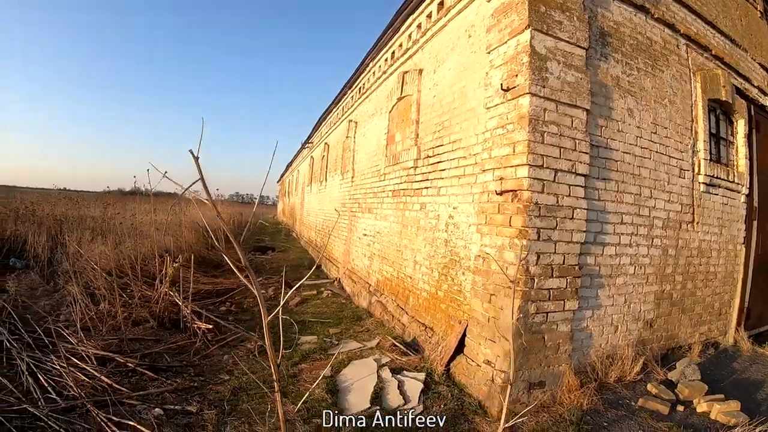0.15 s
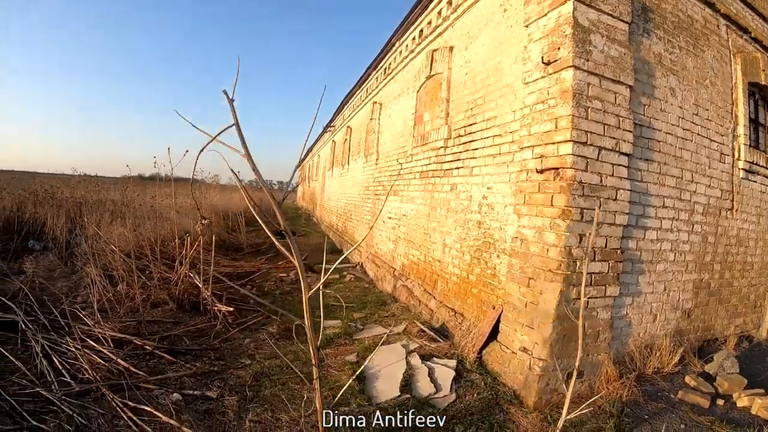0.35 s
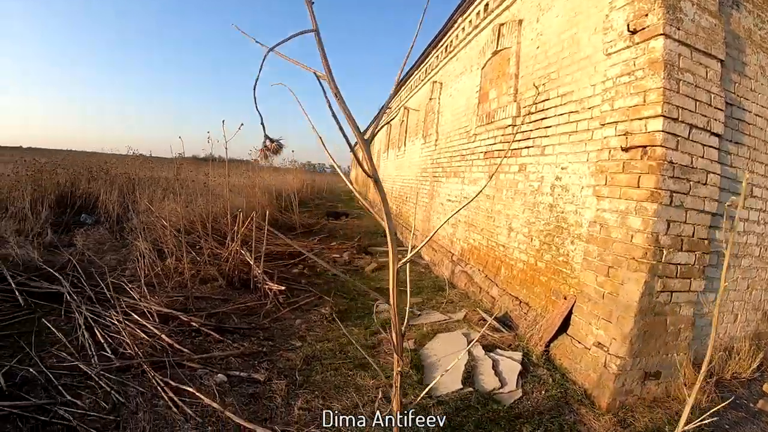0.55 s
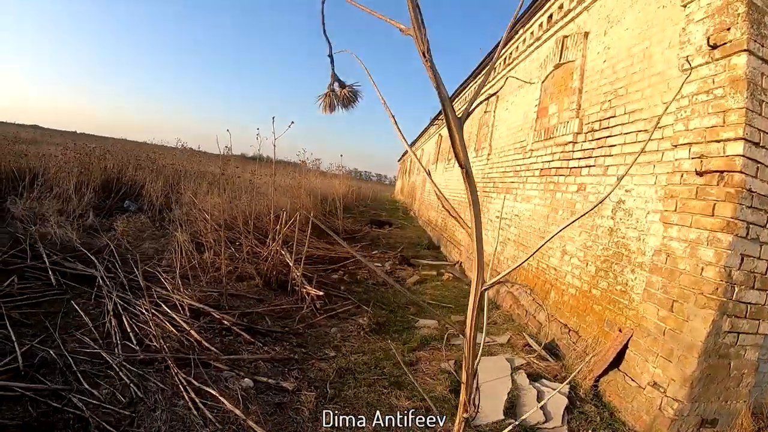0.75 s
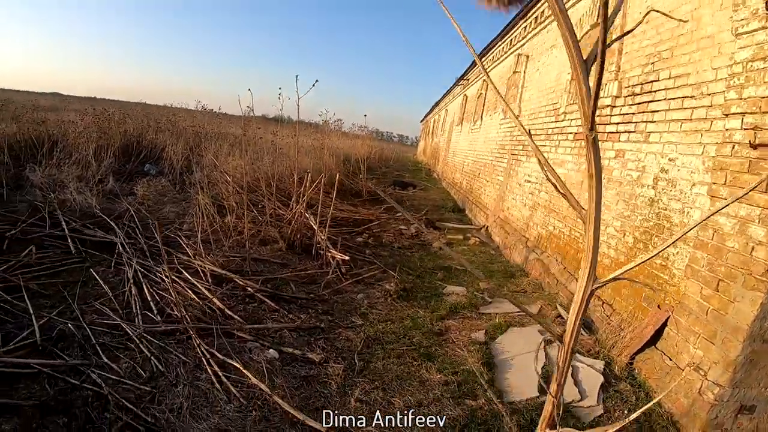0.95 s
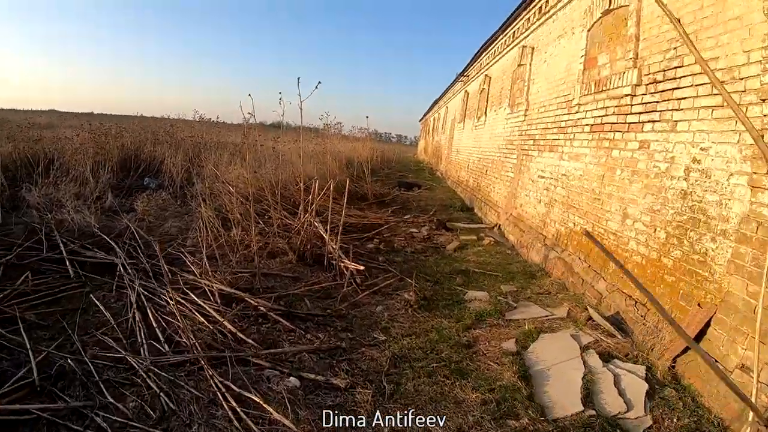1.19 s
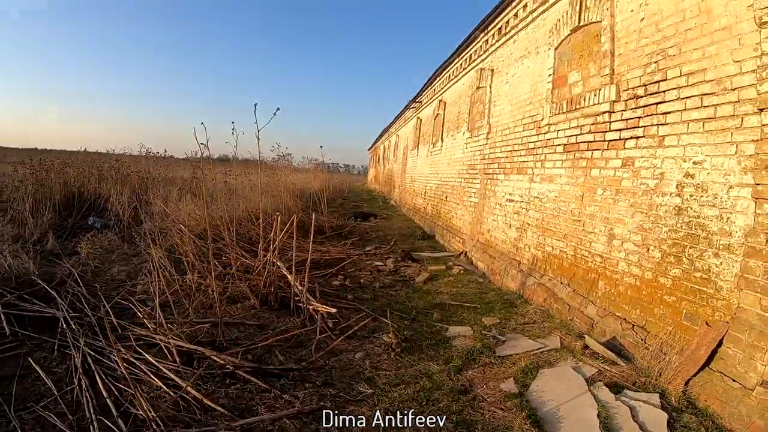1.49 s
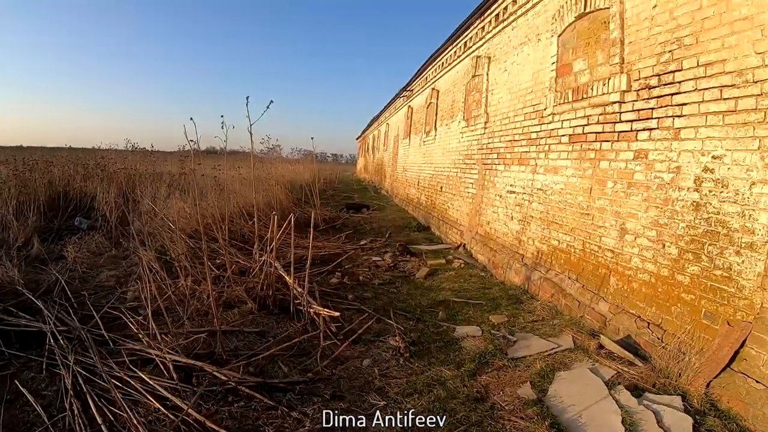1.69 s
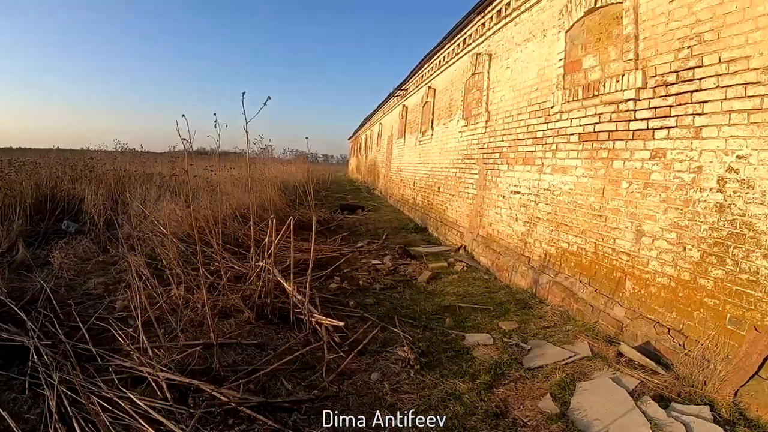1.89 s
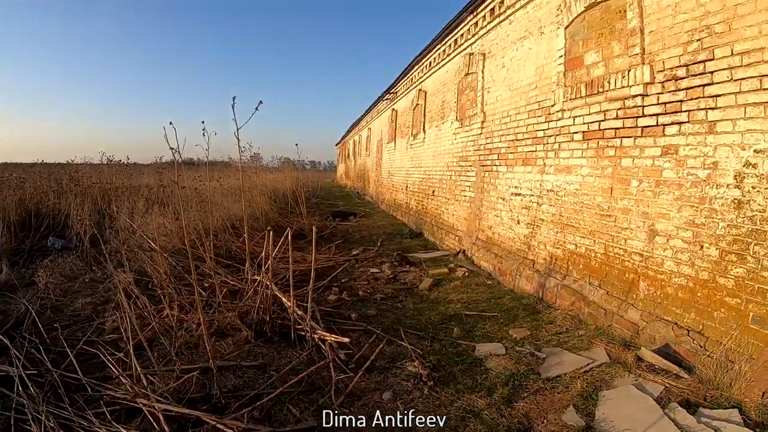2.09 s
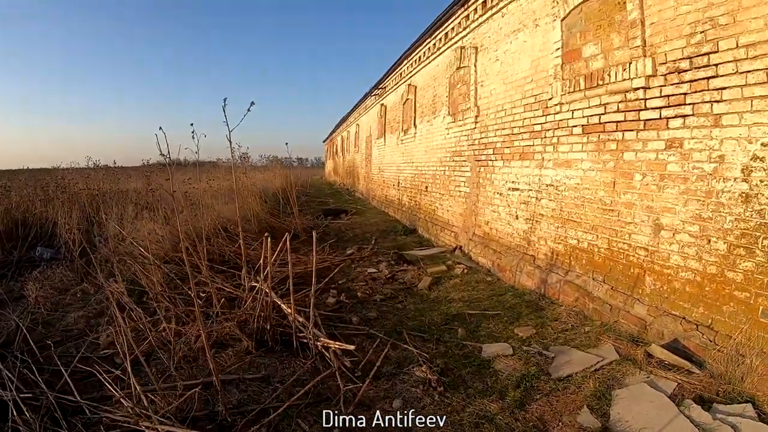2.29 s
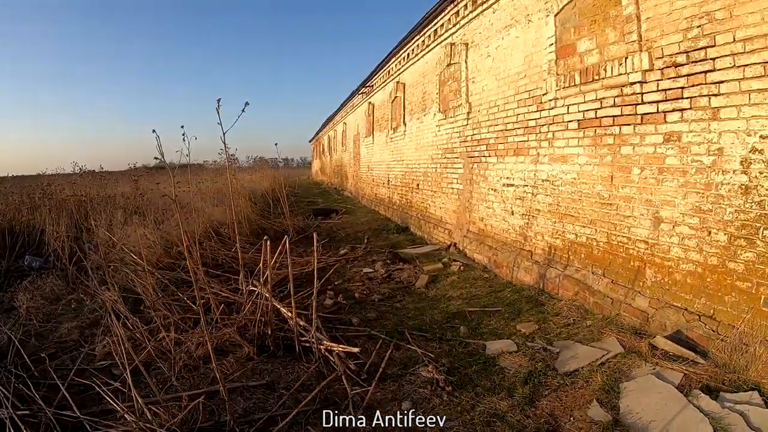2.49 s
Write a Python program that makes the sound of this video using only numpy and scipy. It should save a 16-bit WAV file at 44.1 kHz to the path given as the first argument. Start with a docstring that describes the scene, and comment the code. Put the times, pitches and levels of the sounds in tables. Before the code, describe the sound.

Slow footsteps crunch through dry stalks and grass, stalks snapping, low wind rumble on the microphone

```python
"""Footsteps in grass and dry stalks

Four slow steps along a brick wall jolt the camera: filtered noise swishes over short grass, then three
crunch into dry stalks, built from tiny noise bursts and ringing splinters; stalks snap as bright bursts.
A bare sapling ticks in noise bursts, and bits of brick clink as decaying sines under the last step.
Moving air, coloured noise, rumbles on the microphone ports and dies down over a faint outdoor hiss."""
import sys
import numpy as np
from scipy import signal
from scipy.fft import rfft, irfft, next_fast_len
from scipy.io import wavfile
from scipy.ndimage import map_coordinates

SR = 44100
rng = np.random.default_rng(int(sys.argv[2]) if len(sys.argv) > 2 else 0)


def materialize(psi):
    """Save the field psi as 16-bit PCM at rate SR to the path in sys.argv[1].

    A 1-D psi becomes a single channel; in a 2-D psi each row is a channel.
    """
    bounded = np.clip(np.atleast_2d(psi).T, -1, 1)
    quanta = np.round(bounded * 32767).astype(np.int16)
    wavfile.write(sys.argv[1], SR, quanta)


N = 116865

# stereo width of air and thuds: (frequency [Hz], side over mid [dB])
AIR_SIDE = [(40, -1), (250, 0), (600, 2), (1500, 0)]


def amp(db):
    """Decibels to gain."""
    return 10 ** (np.asarray(db) / 20)


def unit(x):
    """Scaled to rms 1."""
    return x / np.sqrt(np.mean(x ** 2) + 1e-20)


def curve(rows):
    """One value per sample from (time [s], value) rows."""
    return np.interp(np.arange(N) / SR, *np.transpose(rows))


def wobble(rate):
    """A smooth random curve, rate knots a second."""
    return map_coordinates(rng.standard_normal(400), [np.arange(N) * rate / SR], mode="wrap")


def coloured(x, points):
    """x through a causal minimum-phase filter with the given (frequency [Hz], gain [dB]) points."""
    m = 2 * next_fast_len(N // 2 + 4096)
    hz, db = np.transpose(points)
    log_hz = np.log(np.fft.rfftfreq(m, 1 / SR) + 1)
    cep = irfft(np.log(amp(np.interp(log_hz, np.log(hz), db))), m)
    # folding the cepstrum makes the filter causal
    cep[1:m // 2] *= 2
    cep[m // 2 + 1:] = 0
    return irfft(rfft(x, m) * np.exp(rfft(cep)), m)[..., :N]


def voiced(x, colour):
    """x coloured without changing the power of a white input."""
    hz, db = np.transpose(colour)
    gain = amp(np.interp(np.log(np.linspace(1, SR / 2, N // 8)), np.log(hz), db))
    return coloured(x, colour) / np.sqrt(np.mean(gain ** 2))


def stereo(pair, width):
    """Left and right from a mid signal and a side signal, the side filtered by the width."""
    side = coloured(pair[1], width)
    return np.array([pair[0] + side, pair[0] - side])


def noise():
    """Two unrelated white noises."""
    return rng.standard_normal((2, N))


def press(s, db, rise, hold, fall):
    """Gain of one load: it touches, rises, holds and falls away (fall in dB per second)."""
    contact_s, rise_db = 0.004, 10
    t = np.arange(N) / SR - s
    touch = np.clip(t / contact_s, 0, 1)
    climb = rise_db * np.clip(1 - t / max(rise, 1e-3), 0, 1)
    release = fall * np.maximum(t - rise - hold, 0)
    return touch * amp(db - climb - release)


def add(track, s, sound):
    """Mix a short sound into a track at time s."""
    part = track[..., int(s * SR):][..., :sound.shape[-1]]
    part += sound[..., :part.shape[-1]]


def crackle(count=6):
    """Layers of dense tiny fractures, each a decaying noise burst, over a soft rustle; rms 1."""
    grains_per_s, spread_db, grain_t60_s, rustle_db = 2200, 3.8, 0.004, -7
    t = np.arange(SR // 100) / SR
    out = np.zeros((2, N))
    for _ in range(count):
        sizes = amp(spread_db * np.minimum(rng.exponential(size=N), 4))
        sizes = sizes * (rng.random(N) < grains_per_s / count / SR)
        hits = sizes * rng.choice([-1, 1], N)
        crack = rng.standard_normal((2, len(t))) * amp(-60 * t / grain_t60_s)
        out += signal.fftconvolve(hits[None], crack, axes=1)[:, :N]
    return unit(unit(out) + amp(rustle_db) * noise())


def cracks(rows, t60, tail_db):
    """A white burst with a faint noise tail for each (time [s], relative level [dB]) row."""
    tail_t60_s = 0.08
    t, out = np.arange(SR // 10) / SR, np.zeros((2, N))
    shape = amp(-60 * t / t60) + amp(tail_db - 60 * t / tail_t60_s)
    for s, db in rows:
        add(out, s, 2 * amp(db) * shape * rng.standard_normal((2, len(t))))
    return out


def uneven(depth_db):
    """Gain of blades and stalks giving way in clumps: a fast random wobble in dB, rms 1."""
    return unit(amp(depth_db * wobble(150)))


def field():
    """Faint hiss of the open field: coloured noise, unrelated from side to side."""
    # hiss spectrum: (frequency [Hz], density [dB])
    hiss_colour = [(100, 12), (900, 4), (1500, 2), (2200, -5.5), (2650, 0.5), (3300, -9.5), (5000, -10),
                   (6600, -8), (8500, -23), (11000, -26.5), (15000, -39.5)]
    return amp(-66.5) * voiced(noise(), hiss_colour)


def air():
    """Turbulence on the ports: a lumpy rumble of low noise and a faster flutter above it."""
    # swell of each part before its trim: (time [s], level [dB])
    rumble_swell = [(0.0, -26.5), (0.12, -24.5), (0.24, -20.5), (0.43, -24), (0.52, -20.5), (0.67, -24.5),
                    (0.72, -27.5), (0.9, -30), (1.0, -28), (1.16, -34), (1.2, -25), (1.34, -31),
                    (1.62, -35), (1.67, -41.5), (1.96, -31.5), (2.29, -48.5), (2.35, -40), (2.44, -42.5),
                    (2.51, -37.5), (2.65, -42)]
    flutter_swell = [(0.0, -33.5), (0.11, -47), (0.18, -32), (0.4, -38), (0.49, -30.5), (0.68, -28.5),
                     (0.7, -35.5), (0.94, -35), (1.05, -27.5), (1.07, -30), (1.11, -29), (1.48, -38),
                     (1.5, -33), (1.56, -46), (1.72, -39), (1.8, -37), (1.9, -32), (2.08, -36), (2.16, -50),
                     (2.24, -55.5), (2.44, -61), (2.51, -53), (2.65, -60)]
    # spectra: (frequency [Hz], density [dB])
    rumble_colour = [(12, -16), (25, -3), (65, 2.5), (110, -2), (170, -16), (260, -35), (500, -65),
                     (1500, -110)]
    flutter_colour = [(50, -34), (120, 5.5), (190, 4.5), (300, -10), (450, -18), (700, -35.5),
                      (1100, -50.5), (3000, -72.5), (8000, -110)]
    rumble_trim_db, flutter_trim_db = -2.5, -0.5
    rumble = unit(voiced(noise(), rumble_colour) * amp(1.3 * wobble(22)))
    rumble = rumble * amp(curve(rumble_swell) + rumble_trim_db)
    flutter = unit(voiced(noise(), flutter_colour) * amp(2.2 * wobble(44.9)))
    flutter = flutter * amp(curve(flutter_swell) + flutter_trim_db)
    return stereo(rumble + flutter, AIR_SIDE)


def sapling():
    """Twigs tick as short noise bursts and scrape as a rough run of tiny fractures."""
    # ticks: (time [s], relative level [dB])
    twig_ticks = [(.332, -60), (.691, -62), (1.0355, -48), (1.058, -55), (1.0665, -57), (1.0975, -49),
                  (1.1215, -37.5)]
    # bare wood spectrum: (frequency [Hz], gain [dB])
    twig_colour = [(300, -2.5), (1200, 9.5), (2500, 1.5), (5000, 5.5), (7000, 2), (10000, -10),
                   (14000, -13), (15700, -26.5)]
    ticks = cracks(twig_ticks, t60=0.006, tail_db=-18.5)
    scrape = press(1.019, db=-62, rise=0.053, hold=0.085, fall=480) * crackle() * uneven(depth_db=4.0)
    return stereo(voiced(ticks + scrape, twig_colour), [(1000, -13), (10000, 1)])


def clinks():
    """Brick chips ring very briefly: each is a decaying sine with a quick onset."""
    # chips: (time [s], pitch [Hz], level before the onset and decay [dB])
    chips = [(2.548, 2400, -43), (2.600, 1970, -39), (2.603, 3280, -37), (2.607, 3580, -44),
             (2.609, 2660, -39), (2.614, 2920, -35)]
    ring_t60_s, onset_s = 0.025, 0.00026
    t, out = np.arange(SR // 10) / SR, np.zeros(N)
    for s, hz, db in chips:
        envelope = amp(db - 60 * t / ring_t60_s) * (1 - np.exp(-t / onset_s))
        add(out, s, envelope * np.sin(2 * np.pi * hz * t))
    return out


def jolts():
    """The walker's weight jolts the camera: a pitched push that swings back and dies at once."""
    # (time [s], envelope peak before panning [dB], pitch [Hz], left minus right [dB])
    pushes = [(.241, -17, 129, -2.5), (.246, -27.5, 261, -8), (0.281, -16, 80, -19),
              (0.2846, -35.5, 375, -8), (.440, -14.5, 95, -14), (0.504, -20.5, 117, -8),
              (.5105, -24, 315, -10), (.534, -13.5, 97, -13), (.560, -23, 127, -18), (0.567, -23, 274, -12),
              (0.625, -15.5, 73, 6), (.631, -35, 373, 7), (.670, -16, 93, 9), (.802, -29, 230, 2),
              (0.978, -23.5, 130, 12), (1.043, -16, 264, 7), (1.102, -18.5, 137, 6), (1.1172, -14, 193, 8),
              (1.123, -17.5, 520, 0), (1.491, -24.5, 115, -1), (1.6032, -27, 149, -1),
              (1.923, -20.5, 600, 12), (2.266, -35.5, 167, 5)]
    cycles_to_peak = 0.47  # of the envelope
    t, out = np.arange(SR // 10) / SR, np.zeros((2, N))
    for s, db, hz, pan_db in pushes:
        age = hz * t / cycles_to_peak
        gain = amp(db + pan_db * np.array([[.5], [-.5]]))
        add(out, s, gain * age ** 2 * np.exp(2 * (1 - age)) * np.sin(2 * np.pi * hz * t))
    return out


def thuds():
    """Dull weight of feet and body: enveloped noise under a lowpass; a soft thud has no top."""
    # (time [s], level before filtering [dB], rise [s], hold [s], fall [dB/s], hardness as upper edge [Hz])
    blows = [(0.236, -35.5, 0.0041, 0.0026, 903.5, 437), (0.28, -38, 0.0034, .007, 708, 430),
             (0.478, -39, 0.011, 0.055, 305, 570), (0.618, -38, 0.014, 0.017, 404, 540),
             (0.964, -37, 0.005, 0.041, 209.5, 670), (1.004, -39.5, .004, 0.016, 154, 1290),
             (1.04, -27, 0.0029, 0.002, 804, 1010), (1.087, -32, 0.0085, 0.0091, 307, 1410),
             (1.115, -26.5, 0.0015, 0.016, 701, 2400), (1.153, -30, 0.033, 0.032, 57, 1350),
             (1.491, -33.5, 0.003, 0.012, 499, 900), (1.513, -36.5, 0.0026, 0.026, 804, 2200),
             (1.593, -41, 0.0073, 0.021, 304, 590), (1.82, -37.5, 0.011, 0.052, 129, 1420),
             (1.871, -31, 0.037, 0.03, 344, 1650), (2.38, -53, 0.013, 0.15, 60, 456),
             (2.512, -32, 0.0015, 0.0043, 459, 1420), (2.557, -49.5, 0.0078, 0.056, 100, 452)]
    # body of a thud: (frequency [Hz], gain [dB])
    thud_colour = [(40, -37), (130, 3), (280, 4.5), (500, -2.5), (720, -9.5), (1000, -20.5), (1600, -24.5),
                   (3000, -48.5), (8000, -64)]
    out = np.zeros((2, N))
    for *load, edge_hz in blows:
        lowpass = signal.butter(3, edge_hz, fs=SR, output="sos")
        out += signal.sosfilt(lowpass, noise() * press(*load))
    return stereo(voiced(out, thud_colour), AIR_SIDE)


def scuffs():
    """Short gritty slides of the sole on soil: crackle shaped by brief loads."""
    # (time [s], level [dB], rise [s], hold [s], fall [dB/s])
    slides = [(0.658, -58, 0.0077, 0.011, 250.5), (1.507, -51.5, 0.0051, 0.021, 701),
              (1.879, -41.5, 0.032, 0.014, 500)]
    # grit spectrum: (frequency [Hz], gain [dB])
    scuff_colour = [(200, -21), (500, -3.5), (750, 8), (1000, 0.5), (1350, -3), (1900, -14), (3000, -24.5),
                    (8000, -49)]
    # (frequency [Hz], side over mid [dB])
    scuff_side = [(300, -6), (3000, -12)]
    grit = crackle() * sum(press(*row) for row in slides)
    return stereo(voiced(grit, scuff_colour), scuff_side)


def soft_step():
    """The shoe swishes over short grass, the heel bursts dully and the sole rolls down: shaped noise."""
    # spectra of heel, swish and sole: (frequency [Hz], gain [dB])
    heel_colour = [(200, -5), (900, 1.5), (1600, -11), (3000, -27), (10000, -40), (15000, -69)]
    swish_colour = [(150, -16), (600, -9.5), (1100, -1.5), (1700, -9), (2700, -8), (4600, -17),
                    (6200, -1.5), (7600, 1), (9200, -8), (11000, -19.5), (14500, -25), (16000, -58)]
    sole_colour = [(300, -14), (1200, 5), (2400, 3), (3500, 0), (4600, -6), (7500, 0.5), (10000, -10),
                   (14000, -21), (15500, -19.5)]
    # (frequency [Hz], side over mid [dB])
    swish_side = [(300, 0), (12000, 0)]
    pan_db, rough_db = -5.5, 1.0  # left minus right; depth of the unevenness
    heel = cracks([(0.49, -53.5)], t60=0.039, tail_db=-6.5)
    # a faint swish of grass around the leg, before and during the landing
    stride = press(0, -78, rise=0.33, hold=0.37, fall=120)
    landing = press(0.4253, -49.5, rise=0.018, hold=0.0089, fall=136.5)
    swish = (stride + landing) * unit(crackle() + noise()) * uneven(rough_db)
    roll = press(0.509, -57, rise=0.039, hold=0.014, fall=110)
    sole = roll * unit(crackle() + noise()) * uneven(rough_db)
    step = voiced(heel, heel_colour) + voiced(swish, swish_colour) + voiced(sole, sole_colour)
    return stereo(step, swish_side) * amp(np.outer([.5, -.5], pan_db))


def splinters():
    """Thin stalks crack one by one, each with a very short ring at its own pitch; rms 1."""
    per_s, spread_db = 2600, 4.4
    middle_hz, scatter_octaves, decay_cycles = 4396, 0.646, 5.6  # decay to 1/e
    t, out = np.arange(SR // 200) / SR, np.zeros((2, N))
    for side in out:
        draws = rng.random((int(per_s * N / SR), 3))  # time, size, polarity
        hz = middle_hz * 2 ** (scatter_octaves * rng.standard_normal((len(draws), 1)))
        hz = np.clip(hz, 900, 12000)
        size = amp(spread_db * np.minimum(-np.log(1 - draws[:, 1:2]), 3.5))
        size = size * np.sign(draws[:, 2:] - .5)
        rings = size * np.sin(2 * np.pi * hz * t) * np.exp(-hz * t / decay_cycles)
        places = (draws[:, :1] * N).astype(int) + np.arange(len(t))
        side += np.bincount(places.ravel(), rings.ravel(), N)[:N]
    return unit(out)


def straw():
    """Dry ticks with ringing splinters 3 dB below them, rms 1 together."""
    return unit(crackle() + amp(-3) * splinters())


def snaps():
    """Stalks break with a bright noise crack; a click and splitting fibres give the woody body."""
    # (time [s], relative level of the bright crack [dB], relative level of the woody body [dB])
    breaks = [(1.175, -44.5, -44.5), (1.198, -55, -63.5), (1.243, -36.5, -39), (1.2843, -40.5, -39.5),
              (1.324, -46, -49), (1.377, -67, -49), (1.4629, -58.5, -57), (1.5877, -56.5, -78),
              (1.6958, -64.5, -74), (1.7553, -72, -67), (1.877, -39, -43.5), (1.913, -64, -42),
              (1.943, -48, -51.5), (1.986, -42.5, -72.5), (2.035, -50, -72), (2.07, -64, -49),
              (2.124, -64, -50), (2.1818, -51, -64), (2.198, -48, -70), (2.234, -45, -66),
              (2.2845, -43, -36), (2.294, -42, -46), (2.31, -46, -59.5), (2.3214, -41, -45),
              (2.417, -44.5, -55), (2.476, -45.5, -49), (2.501, -41, -63), (2.5092, -37.5, -44.5),
              (2.5125, -45, -43), (2.518, -36.5, -26.5), (2.5247, -38.5, -29.5), (2.588, -41, -54)]
    # spectra of crack and body: (frequency [Hz], gain [dB])
    snap_colour = [(500, -30), (1500, -19.5), (3300, -1.5), (3800, 8.5), (4800, 8), (6500, 12), (7300, -13),
                   (8400, -5), (10500, -17), (13000, -36), (15500, -43.5)]
    stem_colour = [(100, -4), (400, 0.5), (600, 10), (820, 14), (1000, -2.5), (1300, 12), (1950, 15),
                   (2350, 15), (2750, 5), (4000, 4), (7000, -2.5), (10000, -23.5)]
    # (frequency [Hz], side over mid [dB]), ahead of a further 6 dB cut of the side signal
    snap_side = [(300, -40), (2200, -40), (5000, -30), (9000, -17), (12000, -15)]
    fibre_t60_s, fibres_db = 0.014, -5.5
    bright = voiced(cracks([(s, db) for s, db, _ in breaks], t60=0.0038, tail_db=-9), snap_colour)
    t, wood = np.arange(SR // 20) / SR, np.zeros(N)
    for s, _, db in breaks:
        fibres = rng.standard_normal(len(t)) * amp(-60 * t / fibre_t60_s)
        fibres = fibres / np.linalg.norm(fibres)
        click = t == 0
        add(wood, s, 10 * amp(db) * (click + amp(fibres_db) * fibres))
    # the second signal of the pair is the side
    return stereo(bright * amp([[0], [-6]]), snap_side) + voiced(wood, stem_colour)


def dry_steps():
    """Straw crushed underfoot, splitting in clumps, settling and brushed by legs: one straw texture."""
    # footfalls: (time [s], level [dB], rise [s], hold [s], fall [dB/s], level of settling straw [dB])
    footfalls = [(1.166, -41.5, 0.033, 0.058, 378, -46.5), (1.827, -50.5, 0.066, 0.017, 102, -47),
                 (2.495, -43.5, 0.0224, 0.012, 289, -81), (2.574, -47, 0.012, 0.012, 75, -66)]
    # bursts of splitting stalks: (time [s], level [dB], fall [dB/s])
    bursts = [(1.16, -50, 500), (1.197, -49.5, 701), (1.233, -48.5, 502), (1.280, -33.5, 1602),
              (1.331, -46.5, 598), (1.351, -54, 500), (1.877, -42.5, 1104), (1.908, -41, 600),
              (1.944, -48, 704), (1.992, -60.5, 403), (2.034, -65, 900), (2.066, -49, 700),
              (2.095, -47, 700), (2.109, -55.5, 348), (2.164, -70.5, 599), (2.606, -53.5, 201)]
    # legs brushing through straw: (time [s], level [dB])
    leg_brush = [(0, -76.5), (1.0, -81.5), (1.3, -67), (1.8, -70.5), (2.05, -49), (2.15, -58), (2.27, -56),
                 (2.305, -47), (2.345, -60), (2.42, -57), (2.45, -59), (2.5, -59), (2.65, -76)]
    # crushed straw spectrum: (frequency [Hz], gain [dB])
    crunch_colour = [(150, 8), (600, 5.5), (1300, 9), (2100, 5.5), (3000, 2), (3550, 3.5), (3800, 7),
                     (4400, 6), (6300, 12.5), (7200, 4), (8400, 0), (10000, -11.5), (12000, -24),
                     (15500, -39)]
    # (frequency [Hz], side over mid [dB])
    straw_side = [(300, -14), (2200, -18), (5000, -10), (9000, -3), (12000, -1)]
    crush = sum(press(s, db, rise, hold, fall) for s, db, rise, hold, fall, _ in footfalls)
    clumps = sum(press(s, db, rise=0.00067, hold=0.0013, fall=fall) for s, db, fall in bursts)
    settle = sum(press(s, db, rise, hold, fall=67) for s, _, rise, hold, _, db in footfalls)
    # loose straw is duller than crushed straw
    loose_colour = [(1000, 1), (3000, -2.0), (6500, -6.0), (9000, -7), (13000, -17.5)]
    loose = coloured(straw() * np.hypot(settle, amp(curve(leg_brush))), loose_colour)
    crunch = (straw() * np.hypot(crush, clumps) + loose) * uneven(depth_db=1.3)
    return stereo(voiced(crunch, crunch_colour), straw_side)


def narrowed(pair):
    """The two sides draw together over time as the side signal fades."""
    # (time [s], side gain [dB])
    spread = [(0, 0), (.95, 0), (1.1, -2), (1.3, -5), (1.5, -10), (1.6, -16), (1.9, -23), (2.0, -33),
              (2.3, -38), (2.65, -42)]
    mid = (pair[0] + pair[1]) / 2
    side = (pair[0] - pair[1]) / 2 * amp(curve(spread))
    return np.array([mid + side, mid - side])


def scene():
    """Everything at the two ports; jolts, snaps and clinks stay outside the narrowing image."""
    # balance of air and thuds: (time [s], left minus right [dB])
    air_pan = [(0, 1), (.17, -5), (.3, -3), (.55, -5), (.65, -1), (.85, -2), (1.0, 3), (1.12, 4), (1.25, 2),
               (1.38, -1), (1.55, 0)]
    lean = amp(np.outer([.5, -.5], curve(air_pan)))
    near = field() + lean * (air() + thuds()) + sapling() + scuffs() + soft_step() + dry_steps()
    return narrowed(near) + jolts() + snaps() + clinks()


def record(dry):
    """The camera keeps nothing above its band limit: a steep cut in the spectrum."""
    top_hz = 15750
    m = next_fast_len(N + SR // 2)
    return irfft(rfft(dry, m) * (np.fft.rfftfreq(m, 1 / SR) < top_hz), m)[:, :N]


dry = scene()
out = record(dry)
materialize(out)
```